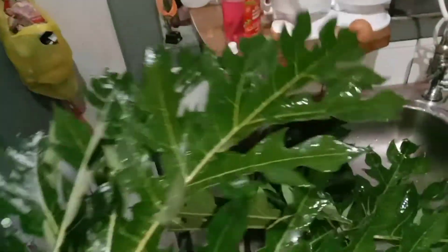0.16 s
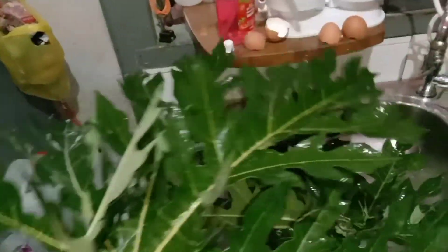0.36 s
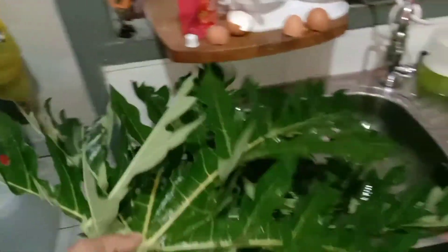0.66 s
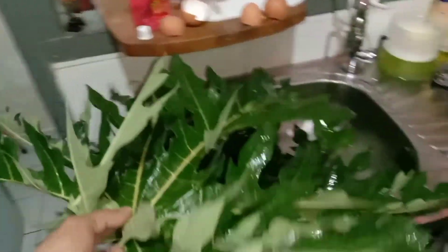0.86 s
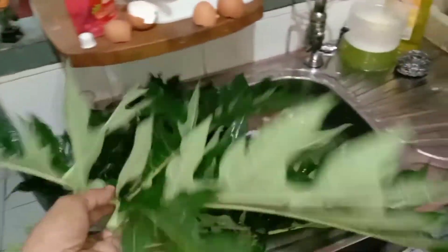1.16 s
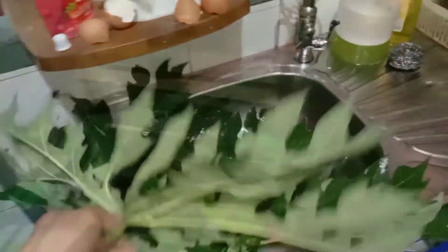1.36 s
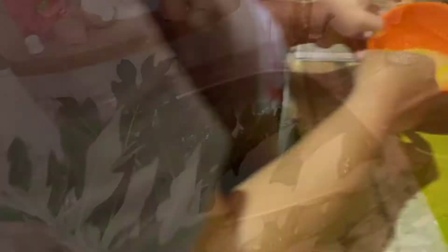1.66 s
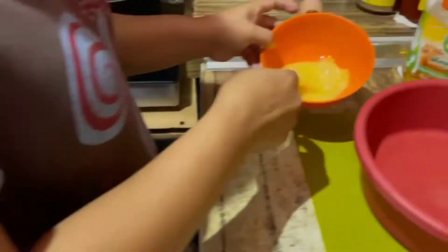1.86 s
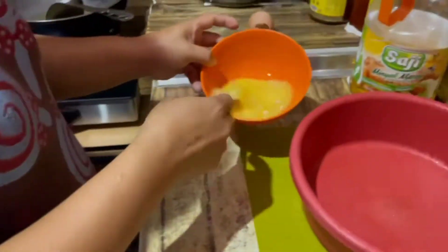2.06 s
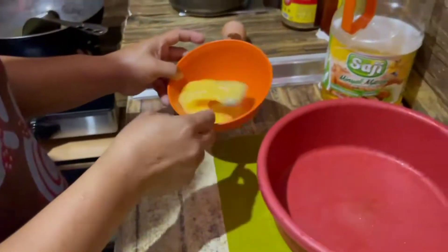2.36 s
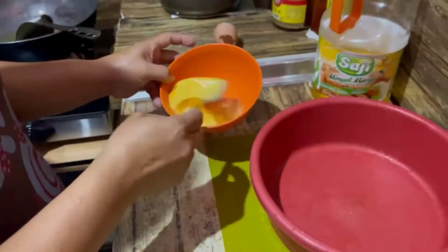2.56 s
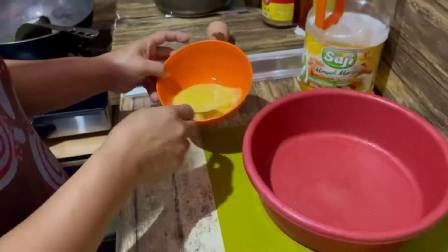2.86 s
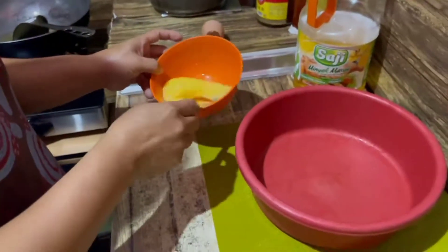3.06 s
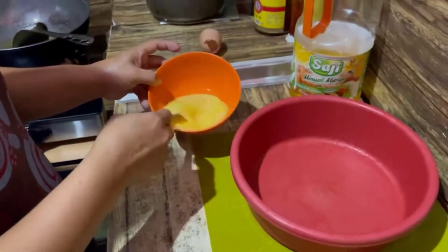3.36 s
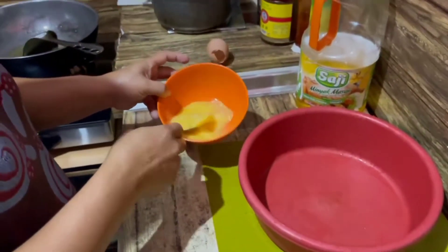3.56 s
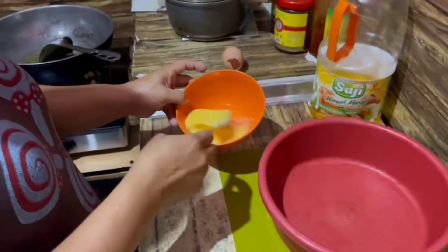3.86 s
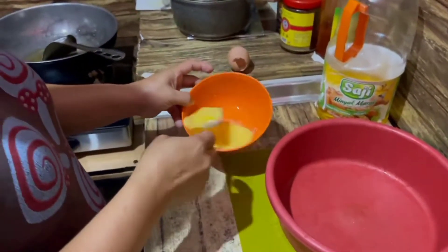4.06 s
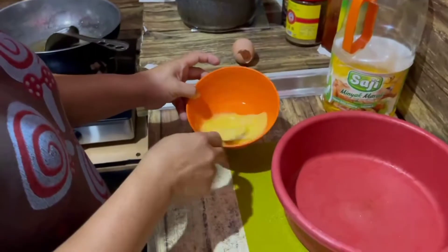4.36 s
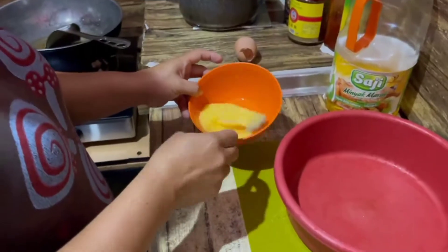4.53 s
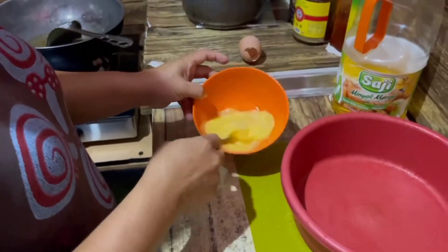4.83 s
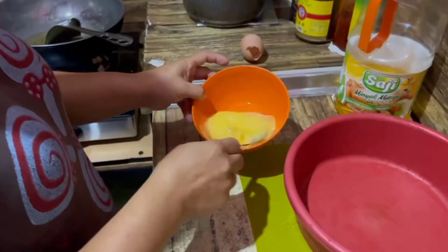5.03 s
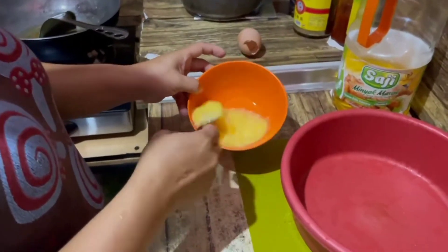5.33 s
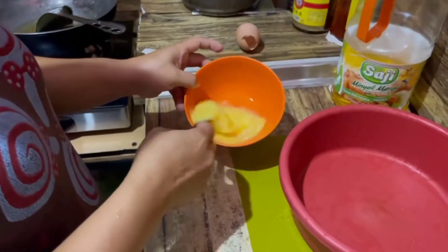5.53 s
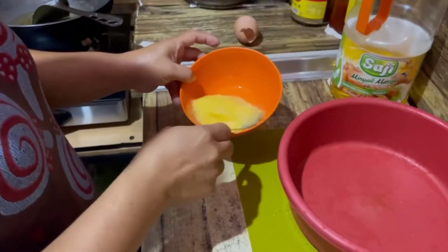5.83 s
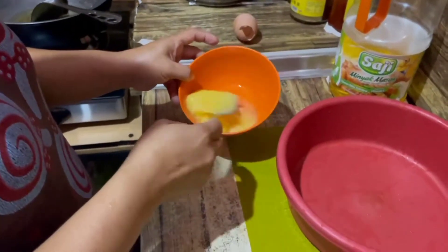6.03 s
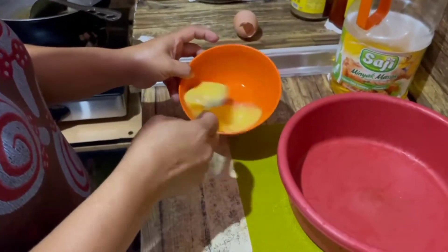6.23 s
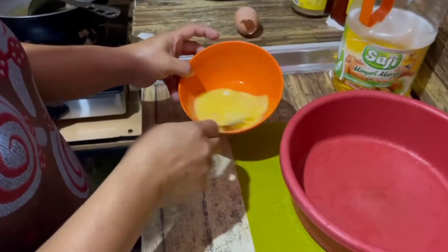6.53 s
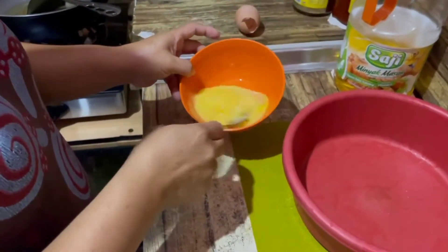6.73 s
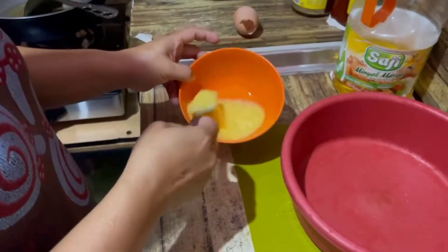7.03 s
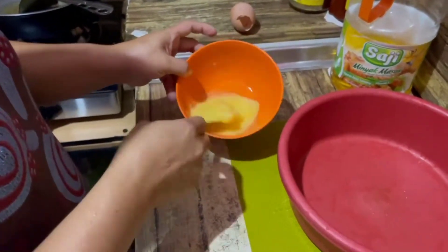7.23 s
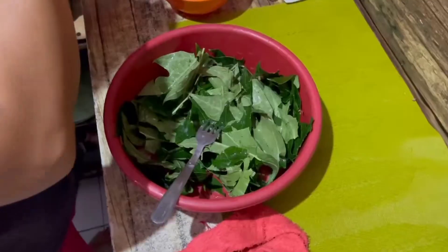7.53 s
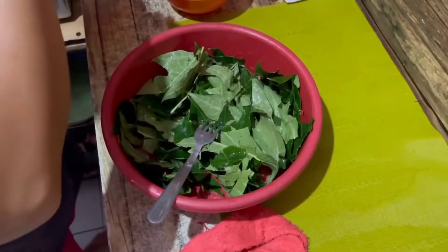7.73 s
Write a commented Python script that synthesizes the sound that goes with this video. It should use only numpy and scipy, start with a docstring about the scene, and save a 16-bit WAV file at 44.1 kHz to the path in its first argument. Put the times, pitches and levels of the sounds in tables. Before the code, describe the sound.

Wet leaves brush and flick over a sink while a tap whistles faintly. Then a fork starts beating an egg in a small plastic bowl, with quick, even clicks, short scrapes and little wet gurgles. Distant traffic rumble and a low hum lie behind it. The beating cuts off near the end, leaving a soft leafy rustle. Everything is heard close up in a small home kitchen.

```python
"""A fork beats an egg in a small plastic bowl: each turn of the wrist knocks the tines on the wall
(impact excitation of its modes) and drags them along the bottom (stick-slip friction), while air
pockets in the egg resonate. Before that, wet leaves are turned over a sink and a tap whistles.
Traffic rumble, a low hum and a few far chirps lie behind; at the end a soft rustle is left over them."""
import sys
import numpy as np
from scipy import signal
from scipy.fft import rfft, irfft, next_fast_len
from scipy.io import wavfile
from scipy.ndimage import uniform_filter1d

SR = 44100
rng = np.random.default_rng(int(sys.argv[2]) if len(sys.argv) > 2 else 0)


def master_out(mix):
    """Clip the mix to full scale and print it as 16-bit PCM to the path in sys.argv[1]."""
    frames = np.transpose(np.atleast_2d(mix))
    ceiling = np.clip(frames, -1, 1)
    pcm = np.round(ceiling * 32767).astype(np.int16)
    wavfile.write(sys.argv[1], SR, pcm)


N = 347949
BEATING_END_S, SCENE_CUTOFF_HZ = 7.437, 11972

# strokes along the bottom: t/s, level/dB, contact time/ms, level change over the contact/dB
STROKES = [(1.575, -31.5, 40, -14), (1.792, -30, 25, -7.5), (1.979, -30.5, 39, -2.5),
           (2.197, -31.5, 23, 3.5), (2.394, -26, 71, -10), (2.616, -25, 42, -7), (2.822, -33.5, 52, 3.5),
           (3.031, -26, 53, -4), (3.25, -26.5, 42, -2.1), (3.475, -29, 45.6, -1.5),
           (3.675, -31.5, 78, -3.5), (3.894, -31, 70, -4), (4.11, -32, 70, -7.5), (4.354, -27.5, 44, -10),
           (4.553, -35, 64, 1.5), (4.774, -29, 64, -8.5), (4.984, -29, 52, -5), (5.185, -44, 61, 12.5),
           (5.424, -29.5, 51, -5), (5.614, -36, 60, 8), (5.845, -30, 61, -5), (6.05, -35.5, 67, 4.5),
           (6.264, -34, 66, 3), (6.474, -32, 65, 4.5), (6.682, -33, 65, 2), (6.898, -33, 54, 1),
           (7.16, -29, 50, -9.5), (7.365, -30, 87, -2.5)]
# modes of bowl and fork: f/Hz, level/dB, decay time/s
BOWL_MODES = [(377, -12, 0.041), (630, -11.5, 0.042), (1026, -5.5, 0.062), (1310, -11.5, 0.088),
              (1391, -9, 0.13), (1522, 0.5, 0.017), (2034, -7.5, 0.054), (2139, -5.5, 0.051),
              (2440, -5.5, 0.016), (2807, -8.5, 0.011), (3348, -11, 0.028), (3680, -16, 0.077),
              (4128, -9.5, 0.021), (4866, -3, 0.0069), (5233, -21, 0.008), (5405, -5, 0.014),
              (6640, -20.5, 0.067), (7650, -8.5, 0.0089), (8650, 0.5, 0.0071), (8920, -30, 0.1),
              (11090, -15.5, 0.038), (10960, -22, 0.032)]
# how differently the bowl radiates to left and right: f/Hz, share
STEREO_SPREAD = [(600, 0.27), (1200, 0.43), (2200, 0.38), (4000, 1), (8000, 0.52)]


def gain_of(db):
    return 10 ** (np.asarray(db) / 20)


def unit_rms(x):
    return x / np.sqrt(np.mean(x ** 2) + 1e-20)


def at_frequency(points, hz):
    f, value = np.transpose(points)
    return np.interp(np.log(hz + 1), np.log(f + 1), value)


def at_time(rows, t):
    times, *columns = np.transpose(rows)
    return [np.interp(t, times, column) for column in columns]


def add(mix, start_s, sound):
    part = mix[..., round(start_s * SR):][..., :sound.shape[-1]]
    part += sound[..., :part.shape[-1]]


def low_pass(x, cutoff_hz):
    taps = signal.firwin(511, cutoff_hz, window=("kaiser", 9), fs=SR)
    return signal.oaconvolve(x, taps[None], "same")


def smoothed(noise, *widths):
    """A moving average along each axis turns noise into a slow fluctuation of unit RMS."""
    for axis, width in enumerate(widths):
        noise = uniform_filter1d(noise, width, axis=axis)
    return unit_rms(noise)


def noise_field(field_db, size, patchy_db):
    """Partially coherent stereo noise whose spectrum level fluctuates about field_db(hz, t)."""
    # coherence of left and right: f/Hz, coefficient
    coherence = [(60, 0.98), (170, 0.98), (490, 0.59), (1400, 0.92), (3980, 0.97), (11400, 0.88)]
    hop = size // 4
    hz, t = np.fft.rfftfreq(size, 1 / SR), np.arange(N // hop + 5) * hop / SR
    a, b, c, d, patches = rng.standard_normal((len(t), len(hz), 5)).T
    alike = at_frequency(coherence, hz)[:, None]
    left = a + 1j * b
    right = alike * left + np.sqrt(1 - alike ** 2) * (c + 1j * d)
    spectra = np.array([left, right]) * gain_of(field_db(hz[:, None], t) + patchy_db * smoothed(patches, 9, 9))
    return signal.istft(spectra, nperseg=size, noverlap=size - hop)[1][:, :N] / np.sqrt(size)


def tone(rows, rough, octave_db):
    """A fundamental and its second harmonic under random amplitude modulation."""
    t = np.arange(N) / SR
    hz, db = at_time(rows, t)
    gate = uniform_filter1d(1. * (t >= rows[0][0]) * (t <= rows[-1][0]), size=2000)
    waver = 1 + rough * smoothed(rng.standard_normal(N), 600)
    phase = 2 * np.pi * np.cumsum(hz) / SR
    partials = np.sin(phase) + gain_of(octave_db) * np.sin(2 * phase)
    return np.sqrt(2) * gain_of(db) * gate * waver * partials


def bubble(db, hz, glide, length_ms, rough=0.):
    """A briefly sounding resonance: a soft-edged sinusoid whose frequency rises by the share glide."""
    progress = np.linspace(0, 1, round(length_ms * SR / 1000) + 8)
    waver = 1 + rough * smoothed(rng.standard_normal(4000), 150)[:len(progress)]
    envelope = np.sin(np.pi * progress ** 0.44) ** 2
    phase = 2 * np.pi * np.cumsum(hz * (1 + glide * progress)) / SR
    return gain_of(db) * envelope * waver * np.sin(phase)


def kitchen():
    """Broadband ambient noise: traffic rumble swells in the bass and room noise fades in above it."""
    # room noise: f/Hz, relative spectrum level/dB
    spectrum = [(12, -22), (20, 10.5), (92, 9.5), (455, -8), (1010, -12), (1820, -17), (2080, -15),
                (3110, -24), (5310, -19.5), (7120, -28.5), (8580, -21.5), (10100, -55), (10900, -25),
                (11800, -44), (15400, -54), (22000, -120)]
    # traffic rumble: t/s, gain below 100 Hz/dB, gain from 100 to 350 Hz/dB
    rumble = [(0.0, -28, -12.5), (1.2, -16, -10.5), (1.4, -8, -7), (2.04, 2, 3), (2.9, 0.5, -0.5),
              (3.9, 1, 3.5), (5.5, 0.5, -1.5), (6.5, 2.5, -1), (7.3, 2, -0.5), (7.89, 3, 1)]

    def field_db(hz, t):
        fade_db = np.interp(t, [1.2, 1.6], [-25, 0])
        swell_db = np.select([hz < 100, hz < 350], at_time(rumble, t), fade_db)
        return swell_db + at_frequency(spectrum, hz)
    return low_pass(gain_of(-25) * noise_field(field_db, size=2048, patchy_db=1), SCENE_CUTOFF_HZ)


def hum():
    """A low tone, slowly modulated in amplitude and frequency."""
    # course of the hum: t/s, f/Hz, level/dB
    course = [(1.25, 106.8, -54), (1.46, 106.9, -49), (2.1, 107.8, -51.5), (2.37, 110.6, -47),
              (2.56, 110.2, -39.5), (2.7, 113, -45), (2.93, 108.2, -40), (3.05, 104.7, -52),
              (3.13, 103.4, -36), (3.5, 104.5, -49.5), (3.9, 102.6, -52), (4.55, 103, -47.5),
              (4.91, 98, -38.5), (5.1, 105.5, -33), (5.25, 103.3, -35.5), (5.5, 103, -44.5),
              (5.77, 102.2, -35), (6.2, 99.1, -37.5), (6.55, 103.5, -48), (6.83, 107.2, -43.5),
              (7.05, 107, -39.5), (7.33, 105.8, -46.5), (7.65, 97, -49), (7.82, 100.3, -39),
              (7.89, 100, -51)]
    return tone(course, rough=0.27, octave_db=-18) * gain_of([[.4], [-.4]])


def chirping():
    """Faint far chirps, placed to the left by differences of level and arrival time."""
    # chirps: t/s, level/dB, f/Hz, relative glide, duration/ms
    chirps = [(1.905, -31, 1430, .12, 70), (1.93, -30, 1720, .04, 48), (2.092, -31, 1405, 0, 90)]
    out = np.zeros(N)
    for start_s, *chirp in chirps:
        add(out, start_s, bubble(*chirp, rough=0.28))
    return np.array([out, .7 * np.roll(out, shift=8)])


def tap():
    """The tap whistles in two narrow-band tones with irregular amplitude modulation."""
    # upper tone: t/s, f/Hz, level/dB
    whistle = [(0.0, 3885, -43), (0.172, 3940, -55), (0.202, 3880, -59), (0.228, 3890, -39.5),
               (0.274, 3860, -69), (0.33, 3820, -43.5), (0.542, 3880, -52.5), (0.6, 3870, -65),
               (0.8, 3800, -64)]
    # lower tone: t/s, f/Hz, level/dB
    undertone = [(0.5, 1279, -63), (0.716, 1267, -65), (0.738, 1275, -41.5), (0.81, 1275, -64),
                 (0.86, 1271, -50), (1.17, 1278, -63), (1.2, 1270, -57.5), (1.6, 1260, -57.5)]
    upper = tone(whistle, rough=0.35, octave_db=-25) * gain_of([[1.1], [-1.1]])
    return upper + tone(undertone, rough=0.99, octave_db=-30)


def leaf_brushing():
    """Sliding friction between wet leaves radiates broadband noise."""
    # friction noise: f/Hz, relative spectrum level/dB
    spectrum = [(60, -25), (110, 2), (226, 0), (440, -2), (950, -4), (1480, -0.5), (2410, -14.5),
                (3910, -4), (6230, -14), (7110, -11.5), (11800, -19.5), (13800, -32), (14600, -17),
                (15600, -28)]
    # strength of the brushing: t/s, gain above 2 kHz/dB, gain below/dB
    course = [(0.0, -33.5, -36.5), (0.4, -39.5, -40.5), (0.55, -34, -35.5), (1.0, -36, -32.5),
              (1.13, -29.5, -34.5), (1.35, -25.5, -27), (1.54, -32, -36)]

    def field_db(hz, t):
        level_db = np.where(hz > 2000, *at_time(course, t))
        return at_frequency(spectrum, hz) + level_db - 200 * (t > course[-1][0])
    high_pass = signal.butter(4, 70, "high", fs=SR, output="sos")
    return signal.sosfilt(high_pass, noise_field(field_db, size=1024, patchy_db=3))


def leaf_flicks():
    """Leaves flick and slap: transients of crackly band-limited noise with exponential decay."""
    # flicks: t/s, level/dB, centre f/Hz, relative bandwidth, T60/s, left minus right/dB
    flicks = [(.005, -35, 6200, 0.27, 0.17, -2), (.156, -30.5, 1120, .96, 0.25, -4),
              (0.158, -39, 4400, 2.9, 0.16, -4), (.215, -40.5, 2920, 0.23, .11, -3),
              (.32, -48, 7240, .14, .15, -2), (.355, -37, 5100, .45, 0.21, -4),
              (.47, -43, 3230, 0.18, 0.074, 1), (0.511, -40, 4180, 0.24, 0.099, -4),
              (0.632, -45, 5130, 0.33, 0.25, 3), (0.684, -43.5, 3600, 0.55, 0.24, -5),
              (.86, -33.5, 300, 1.55, 0.82, 3), (.891, -25, 3290, .4, .19, 3.5),
              (.913, -42, 7640, 0.39, 0.21, 3), (.964, -21.5, 1260, 2.1, 0.03, -5),
              (1.079, -36.5, 6400, .68, 0.14, 2), (1.277, -35.5, 3800, 0.4, 0.22, -3),
              (1.33, -30.5, 4970, 1.54, 0.32, 5), (1.455, -25, 414, .9, 0.027, -1),
              (1.489, -38.5, 5000, 0.3, 0.18, -2), (7.6, -45, 3470, 0.43, .63, 17),
              (7.72, -45, 4620, .84, .34, 1.5)]
    out, t = np.zeros((2, N)), np.arange(SR // 3) / SR
    hz = np.fft.rfftfreq(len(t), 1 / SR)
    for start_s, db, centre_hz, width, t60, pan_db in flicks:
        shared, *own = rng.standard_normal((3, len(t))) * gain_of(2.03 * rng.exponential(1, len(t)))
        band = 1 / (1 + ((hz - centre_hz) / (width * centre_hz / 2)) ** 4)
        puff = unit_rms(irfft(rfft(shared + 0.067 * np.array(own)) * band, len(t)))
        rise_s = .002 + .12 * max(t60 - .22, 0)  # short flicks snap in, long ones swell
        envelope = gain_of(db - 60 * t / t60) * (1 - np.exp(-t / rise_s))
        add(out, start_s, puff * envelope * gain_of([[pan_db / 2], [-pan_db / 2]]))
    return out


def reverberation(x):
    """Reflections from counter and walls arrive with random sign; absorption takes the treble first."""
    size = SR // 2
    echoes = np.zeros((2, size))
    arrivals = np.arange(120, size - 20, 20) + rng.integers(0, 20, (2, (size - 121) // 20))
    np.put_along_axis(echoes, arrivals, rng.choice([-1., 1.], arrivals.shape), 1)
    hz, t, spectra = signal.stft(echoes, SR, nperseg=256)
    t60 = at_frequency([(300, 0.45), (2000, 0.26), (8000, 0.15)], hz)[:, None]
    tail = signal.istft(spectra * gain_of(-60 * t / t60), SR, nperseg=256)[1]
    return signal.fftconvolve(x[None], tail / np.linalg.norm(tail[0]), axes=1)[:, :N]


def egg_bubbles():
    """Bubble resonance: air pockets pop in the egg, and small gurgles follow each stroke."""
    # larger pops: t/s, level/dB, f/Hz, duration/ms
    pops = [(1.789, -25.5, 1113, 30), (1.998, -25.5, 1200, 44), (2.345, -36.5, 711, 32),
            (2.584, -29, 632, 18.5), (2.415, -24, 1590, 20), (2.645, -29, 1040, 21), (2.82, -26.5, 630, 29),
            (2.866, -21, 1034, 24.5), (3.717, -28, 5000, 22), (3.719, -23, 2700, 14.5),
            (3.912, -24, 1550, 19), (4.03, -35, 990, 14.5), (4.15, -24, 1014, 32), (4.354, -22.5, 1016, 24),
            (4.372, -22.5, 2800, 15), (4.909, -44, 1450, 28), (5.222, -25, 1500, 15), (5.347, -41, 900, 18),
            (6.328, -15, 1008, 22), (6.634, -43, 1192, 25)]
    out = np.zeros(N)
    for start_s, db, hz, length_ms in pops:
        add(out, start_s, bubble(db, hz, glide=0.034, length_ms=length_ms))
    for start_s, stroke_db, *_ in STROKES:
        for late, faint, pitch, glide in rng.random((20, 4)):
            hz, db = 600 * 9 ** pitch, stroke_db - 22 * late - 9 * faint
            if start_s + .16 * late < BEATING_END_S:
                add(out, start_s + .12 * late, bubble(db, hz, 0.1 * glide, length_ms=18000 / hz))
    return out


def slosh(x, patchy_db):
    """Time-varying damping: egg slopping over the wall muffles and frees patches of the spectrum."""
    spectra = signal.stft(x, nperseg=256)[2]
    patches = smoothed(rng.standard_normal(spectra.shape[1:]), 4, 6)
    return signal.istft(spectra * gain_of(patchy_db * patches), nperseg=256)[1][:, :N]


def tilt_db(hz, belly_db, bright_db):
    """The point of excitation sets how strongly the low (belly) and the high modes are driven."""
    return np.interp(hz, [1600, 1900, 2800, 3300], [belly_db, 0, 0, bright_db])


def fork_drags():
    """Stick-slip friction: dense tiny slips of the tines on the plastic drive the modes and a hiss."""
    # friction hiss: f/Hz, relative spectrum level/dB
    hiss = [(240, -60), (400, -26), (666, -22), (848, -4.5), (1030, -1), (1300, 3), (2750, 0.5), (3260, -7),
            (5500, 2.5), (8900, -9), (9970, -11.5), (10900, -1.5), (11800, -33), (15400, -43),
            (22000, -120)]
    # drive of the belly modes: t/s, gain/dB
    belly = [(1.6, 3.5), (2.4, -1), (3.0, -1.5), (3.3, -6), (4.3, -1), (4.7, -1), (6.6, -1), (7.4, 3.5)]
    size, ahead_s, fade_t60_ms, skips_per_s = 2 ** 14, .03, 177, 70
    t, hz = np.arange(size) / SR - ahead_s, np.fft.rfftfreq(size, 1 / SR)
    mode_hz, mode_db, decay_s = np.transpose(BOWL_MODES)[:, :, None]
    out = np.zeros((2, N))
    for start_s, stroke_db, contact_ms, change_db in STROKES:
        shared, *own = rng.standard_normal((3, size)) * gain_of(1.8 * rng.exponential(1, size).clip(0, 5))
        grip = gain_of(2.15 * smoothed(rng.standard_normal(size), 300))
        level, pitch = rng.standard_normal((2, len(BOWL_MODES), 1))
        loaded_hz = mode_hz * (1 + .035 * pitch)  # the egg loads the wall anew each turn
        resonances = gain_of(mode_db + 5 * level) / (1 + 2.03j * (hz - loaded_hz) * decay_s)
        response = gain_of(-2) * resonances.sum(0) + gain_of(at_frequency(hiss, hz) - 4.5)
        response /= np.sqrt(np.mean(abs(response) ** 2))
        response *= gain_of(tilt_db(hz, *at_time(belly, start_s), bright_db=0.3))
        skips = gain_of(17) * rng.standard_normal(size) * (rng.random(size) < skips_per_s / SR)
        slips = rfft((shared + skips) * grip) + at_frequency(STEREO_SPREAD, hz) * rfft(own * grip)
        envelope_db = stroke_db + change_db * np.clip(t * 1000 / contact_ms, 0, 1)
        envelope_db -= 60 * np.maximum(t * 1000 - contact_ms, 0) / fade_t60_ms
        dive = gain_of(-5 + 2300 * np.minimum(t, 0))  # the tines cut through the egg before they land
        onset = np.maximum(dive, 1 - np.exp(-t.clip(0) / 0.0044))
        add(out, start_s - ahead_s, gain_of(envelope_db) * onset * irfft(slips * response, size))
    return out


def fork_knocks():
    """Impact excitation: each knock rings the same modes in a new mixture, and the egg soon damps them."""
    # tines on the wall: t/s, level/dB, gain of the belly modes/dB
    knocks = [(1.5468, -33, -1), (1.5733, -31, 5), (1.7666, -36.5, 1), (1.7922, -16, -0.5),
              (1.9814, -9, -5.5), (2.0064, -13.5, -5), (2.1825, -29, 1), (2.1977, -14, -4),
              (2.2044, -21.5, -20), (2.2175, -21, -6), (2.269, -23.5, 1.5), (2.393, 0.5, -9.5),
              (2.4698, -28, 5.5), (2.5827, -41, 10), (2.6144, -6, -5), (2.7423, -35.5, 3.5),
              (2.8217, -14, -6.5), (2.8594, -22, 5), (3.032, -2.5, -9.5), (3.2317, -31.5, 10),
              (3.25, -3.5, -11), (3.2949, -11, -21), (3.474, -12, -3.5), (3.5084, -19, -23),
              (3.677, 1, -12.5), (3.721, -22, 4), (3.7632, -21, 0.5), (3.8621, -26.5, 2.5),
              (3.895, -10, -4), (3.9543, -12.5, 8), (4.0923, -32.5, 2), (4.1102, -11.5, 0.5),
              (4.1499, -16, 0), (4.353, -15.5, -1.5), (4.3973, -12.5, -0.5), (4.5436, -23, -8),
              (4.5509, -12, -2), (4.6062, -10, 4.5), (4.7658, -28, -9), (4.774, -6.5, -5.5),
              (4.833, -15, 7.5), (4.984, -4, -10), (5.0616, -22, 0.5), (5.1347, -35.5, -6),
              (5.1839, -31, 15.5), (5.1966, -12.5, -14), (5.222, -21.5, 4), (5.2679, -20.5, 2.5),
              (5.3932, -31, -5), (5.4266, -20, 4), (5.4773, -11.5, 4), (5.5451, -31.5, 6),
              (5.6064, -21, -11), (5.6135, -5.5, -10.5), (5.643, -27, -1), (5.6804, -4.5, -2),
              (5.8159, -20.5, -11.5), (5.8458, -22, -11), (5.898, -1, -6), (6.0285, -30.5, -2),
              (6.0498, -18.5, 1), (6.111, -5, 2.5), (6.2417, -30.5, -9), (6.2649, -13.5, 0),
              (6.2767, -20, -4), (6.325, -14, 9), (6.4737, -6.5, -12), (6.4987, -25, 0), (6.542, -5.5, 0.5),
              (6.6824, -29, -12), (6.6942, -13, -0.5), (6.713, -9, -8), (6.7504, -11, 3),
              (6.7859, -30.5, 9), (6.898, -10, -0.5), (6.917, -24, 4), (6.9507, -10.5, 2.5),
              (7.1601, -12.5, -1.5), (7.1995, -18.5, 3.5), (7.343, -38.5, 8), (7.3647, -16.5, -18),
              (7.418, -11, 2.5)]
    hz, mode_db, decay_s = np.transpose(BOWL_MODES)[:, :, None]
    out, t = np.zeros((2, N)), np.arange(2200) / SR
    damping_db = -9 * np.clip((t - .0055) / .00057, 0, 1)  # the egg closes over the struck spot
    ring_db = mode_db - 45 * t / decay_s + damping_db
    build_up = 1 - np.exp(-t * hz / 4.74)  # each mode needs a few cycles
    spread_rad = 0.7 * at_frequency(STEREO_SPREAD, hz) * np.array([1, -1])[:, None, None]
    landings_s = np.array(STROKES)[:, 0]
    for start_s, knock_db, belly_db in knocks:
        level, pitch, place = rng.standard_normal((3, len(BOWL_MODES), 1))
        coated_s = max(np.min(abs(start_s - landings_s)) - .049, 0)  # between landings egg coats the tines
        bright_db = -4 - 300 * coated_s - .12 * knock_db  # coated tines and hard blows lose treble
        amplitude = gain_of(knock_db + ring_db + tilt_db(hz, belly_db, bright_db) + 3.5 * level)
        phase = 2 * np.pi * hz * (1 + .022 * pitch) * t + spread_rad * place
        add(out, start_s - .0007, (amplitude * build_up * np.sin(phase)).sum(1))
    return out


def egg_beating():
    """Superposition of the bowl's direct sound and its reverberation; both stop short at the end."""
    # level difference of the direct sound: f/Hz, left minus right/dB
    balance = [(60, 17), (140, -6), (340, 7.5), (830, 1.5), (1980, 1), (4740, 0.5), (11400, 1)]
    # phase difference of the direct sound: f/Hz, lead of the left/rad
    lead = [(0, 0), (1210, -0.3), (3960, 0.7), (4220, 1.1), (4820, -0.4), (5680, 0.2), (6800, -0.1),
            (7490, 0.5), (8700, -0.1), (9130, -0.4), (9650, -3.0), (10900, -3.4), (11200, -5.8),
            (11500, -6.2)]
    size = next_fast_len(N)
    hz = np.fft.rfftfreq(size, 1 / SR)
    source = fork_knocks() + slosh(fork_drags(), patchy_db=3.5) + egg_bubbles()
    to_left = gain_of(at_frequency(balance, hz) / 2) * np.exp(.5j * at_frequency(lead, hz))
    direct = irfft(rfft(source, size) * np.array([to_left, 1 / to_left]), size)[:, :N]
    reflected = gain_of(-11.5) * reverberation(source.mean(0))
    gate = np.clip((BEATING_END_S - np.arange(N) / SR) / .002, 0, 1)
    return low_pass((direct + reflected) * gate, SCENE_CUTOFF_HZ)


def scene():
    """The sound pressures of all sources add linearly."""
    return tap() + hum() + egg_beating() + kitchen() + leaf_brushing() + leaf_flicks() + chirping()


def record(dry):
    """Band limiting removes the deepest bass and the top treble; peaks clip at full scale."""
    high_pass = signal.butter(3, 38, "high", fs=SR, output="sos")
    return np.clip(low_pass(signal.sosfilt(high_pass, dry), cutoff_hz=15700), -1, 1)


dry = scene()
out = record(dry)
master_out(out)
```